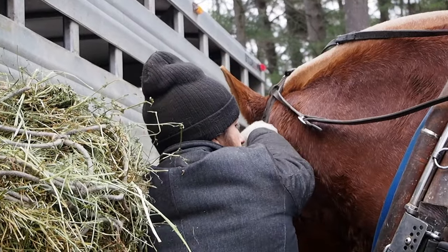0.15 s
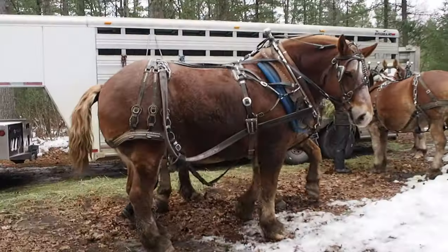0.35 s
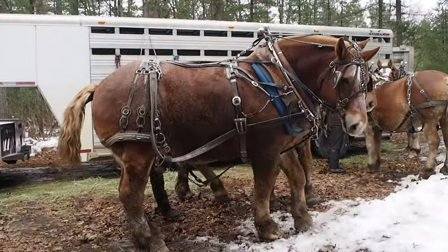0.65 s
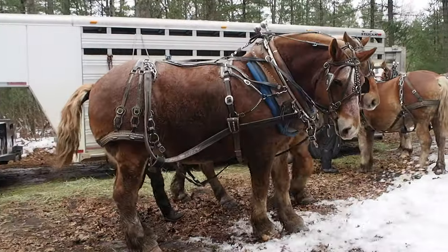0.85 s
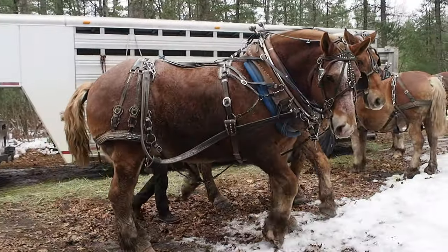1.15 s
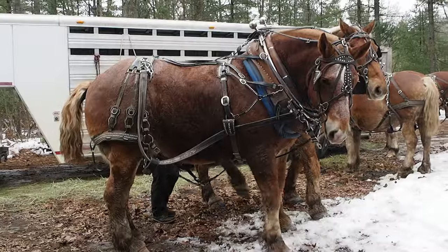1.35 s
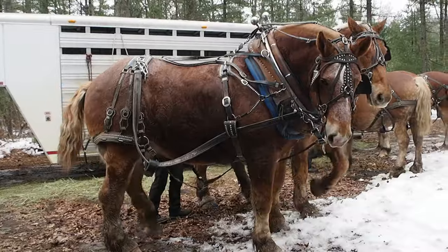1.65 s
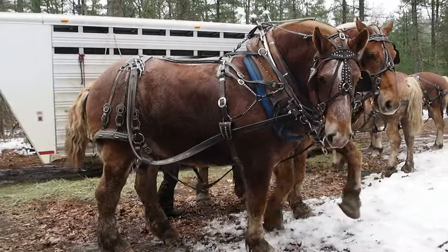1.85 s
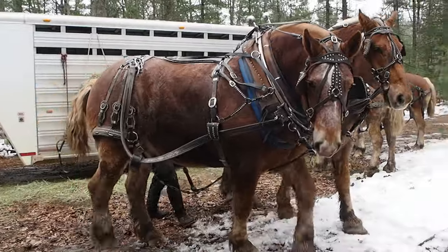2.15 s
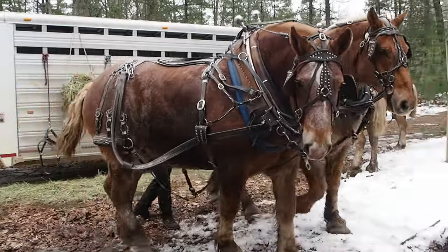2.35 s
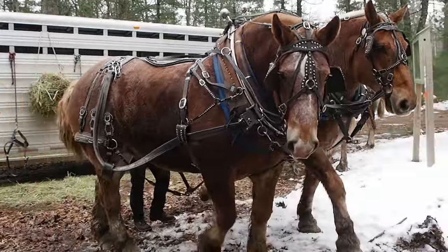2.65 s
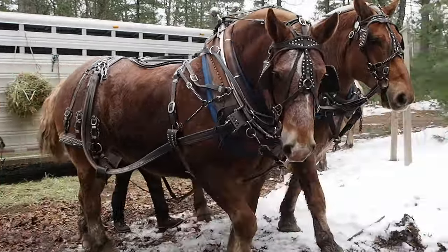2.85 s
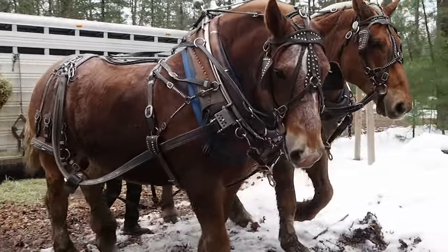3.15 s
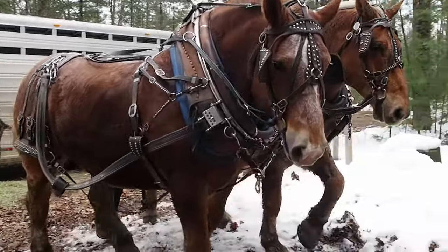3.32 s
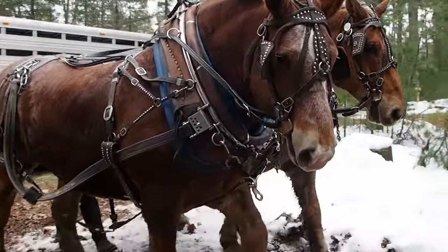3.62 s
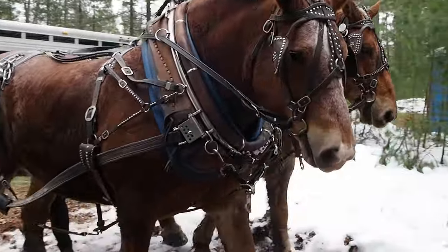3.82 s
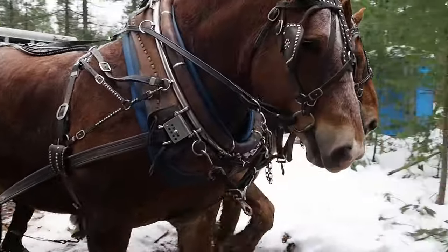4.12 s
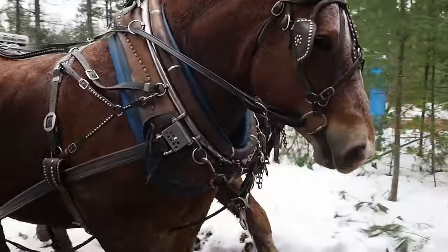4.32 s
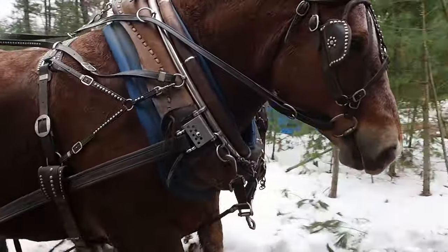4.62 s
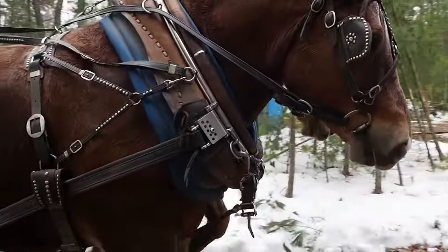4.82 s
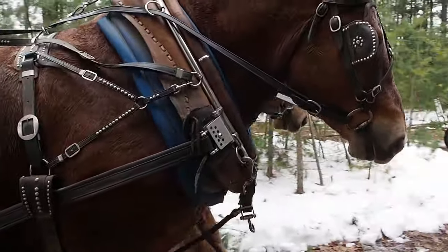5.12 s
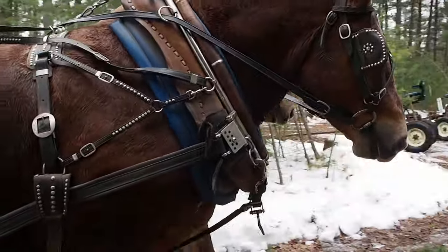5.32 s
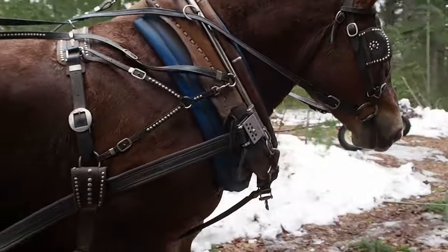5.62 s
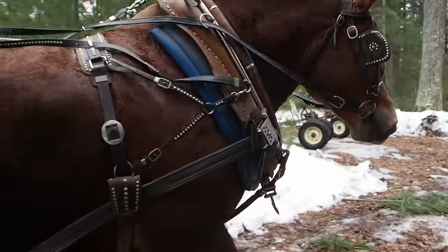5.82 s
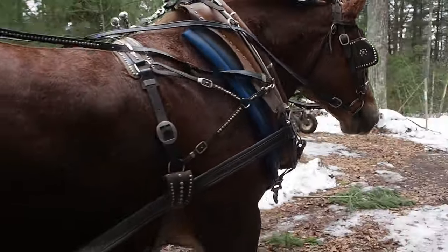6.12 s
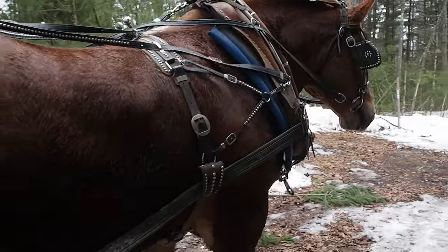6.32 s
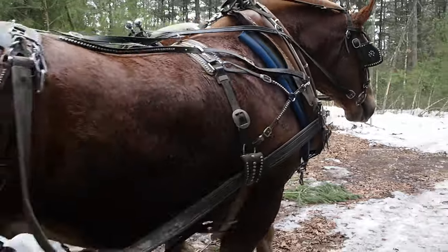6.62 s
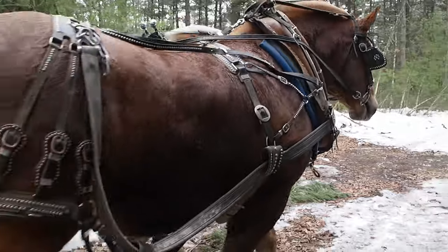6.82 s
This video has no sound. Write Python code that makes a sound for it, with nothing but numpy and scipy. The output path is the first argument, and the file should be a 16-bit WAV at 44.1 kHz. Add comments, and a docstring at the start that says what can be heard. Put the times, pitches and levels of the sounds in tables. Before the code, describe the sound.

Two harnessed draft horses walk past close to a stereo microphone in a quiet wood. Their hooves thud and scuff unevenly, crackling through wood chips and squashing old snow, with an occasional twig snap. As the team comes nearer, the steps grow a little louder and the steel rings and snaps of the harness knock together in short, damped clinks, with a few light chain tinkles.

```python
"""Hooves thud and scuff over wood chips and old snow: two harnessed draft horses walk past, close
to a stereo microphone in a quiet wood. Under their weight the chips crackle, the snow packs with a
low squash and ice crystals fizz, all in swarms of tiny fractures. As the team comes near, the steel
rings and snaps of the harness knock together in short, leather-damped clinks."""
import sys
import numpy as np
from scipy import signal
from scipy.io import wavfile
from scipy.ndimage import uniform_filter1d

SR = 44100
rng = np.random.default_rng(int(sys.argv[2]) if len(sys.argv) > 2 else 0)


def output_pcm(signal):
    """Save a mono or channel-first signal as 16-bit PCM at the path in sys.argv[1].

    Samples are clipped to [-1, 1] before scaling.
    """
    pcm = np.clip(np.atleast_2d(signal).T, -1, 1) * 32767
    wavfile.write(sys.argv[1], SR, np.round(pcm).astype(np.int16))


N = 307509

# Spectra. Each row: frequency in Hz, level in dB per Hz.
AIR_SPECTRUM = [(18, -40), (30, 7), (48, 7.5), (153, 12), (189, -1), (449, 8), (1430, -15), (3980, 1),
                (11700, -5), (16000, -5.5)]  # quiet woodland
CRACKLE_SPECTRUM = [(47, -47), (80, -15), (289, 0), (353, -16), (629, -6.5), (1120, -12), (1340, -2),
                    (2600, -1), (3240, 2), (4140, 2.5), (5770, -4), (12300, -10), (14600, -18.5),
                    (16000, -38)]  # chips and ice breaking
SQUASH_SPECTRUM = [(70, -15), (150, -8), (300, -2.5), (550, 0.5), (900, -1), (1300, -1), (1650, -4.5),
                   (2300, -10), (5000, -54)]  # snow packing
RUMBLE_SPECTRUM = [(25, -13), (45, -3), (58, -6), (75, 12), (130, 12.5), (200, 5), (400, -19)]  # low, wide rumble at the microphone
# Width of the stereo microphone. Each row: frequency in Hz, gain of the side signal in dB.
MIC_WIDTH = [(60, 10.5), (120, 0.5), (220, -2), (400, -3.5), (700, -4.5), (1300, -7), (2400, -12),
             (4400, -23), (6000, -4), (8200, 1), (15000, 1.5)]

# The team shuffles in the litter, louder as it nears. Each row: time in seconds, level in dB.
SHUFFLE_LEVELS = [(0, -48.5), (.2, -55.5), (.29, -58), (.33, -44), (1.2, -44), (1.68, -43.5), (2.3, -39),
                  (4.05, -41), (4.95, -40), (6.97, -38.5)]
# Offsets on that level in dB, for crackle, squash and fizz.
SHUFFLE_SHARE_DB = [0, -8, -10.5]
# The ground gives under a hoof. Each row: time of full load and hold in seconds, then crackle,
# squash and fizz in dB.
HOOF_LOADS = [(0.613, 0.12, -41, -41.5, -48.5), (0.862, 0.037, -38, -47.5, -49.5),
              (0.946, 0.13, -41, -72, -46.5), (1.136, 0.16, -38.5, -46, -45.5),
              (1.41, 0.085, -39.5, -44, -49), (1.784, 0.074, -38.5, -48.5, -47),
              (2.081, 0.19, -34, -42.5, -45), (2.378, 0.063, -37, -43.5, -42),
              (2.612, 0.079, -37, -59, -38.5), (2.75, 0.046, -30.5, -34.5, -38.5),
              (2.828, 0.31, -31.5, -41.5, -39), (3.343, 0.21, -37.5, -51, -39.5),
              (3.585, 0.058, -37, -36, -43.5), (3.707, 0.11, -38, -48, -42), (3.862, 0.1, -35, -40, -40.5),
              (4.215, 0.15, -37.5, -46.5, -48.5), (4.462, 0.042, -35.5, -42, -47),
              (4.62, .11, -34, -35, -46), (4.77, 0.087, -48, -47.5, -55), (5.033, 0.044, -37.5, -48, -62),
              (5.13, 0.17, -28.5, -43, -35.5), (5.35, 0.21, -38.5, -59, -43.5),
              (5.666, 0.04, -38, -50, -52), (5.952, 0.072, -32, -43, -39), (6.058, 0.095, -35, -43, -44.5),
              (6.512, 0.094, -41, -45, -47.5), (6.7, 0.17, -36, -41, -44)]
# A hoof breaks the crust. Each row: start and length in seconds, then crackle, squash and fizz in dB.
HOOF_SCUFFS = [(0.254, 0.016, -45.5, -45.5, -50), (0.36, 0.02, -32.5, -43, -44),
               (0.541, 0.059, -26, -33.5, -36), (0.59, 0.029, -40, -30, -55),
               (1.105, 0.044, -31.5, -39, -39.5), (1.214, 0.052, -33, -37.5, -52),
               (1.47, 0.027, -34.5, -39.5, -53), (1.724, 0.049, -23, -36, -33),
               (1.965, 0.057, -27.5, -38, -42), (2.103, 0.015, -34, -38, -32.5),
               (2.242, 0.031, -29.5, -39.5, -41.5), (2.39, 0.03, -30, -39, -39.5),
               (2.649, 0.054, -30.5, -33.5, -43), (3.858, 0.055, -33, -38.5, -36),
               (4.07, 0.052, -29.5, -38.5, -40.5), (4.199, 0.061, -34, -37.5, -45),
               (4.376, 0.019, -28, -34.5, -40), (5.115, 0.032, -22, -35.5, -31.5),
               (5.974, 0.028, -29.5, -35, -33.5), (6.674, 0.018, -25.5, -37, -35),
               (6.746, 0.067, -27, -43, -33)]
# Chips and twigs snap. Each row: start in seconds, level in dB, treble in dB.
TWIG_SNAPS = [(.365, -31, -3), (1.7708, -31, 11), (3.067, -29, 4), (3.113, -30, 12), (3.2964, -32, 2),
              (4.358, -30.5, 5), (4.3644, -38, 11), (4.7541, -28, -6), (5.0564, -30, -8),
              (6.0513, -25.5, -2), (6.1968, -26.5, -20), (6.731, -29, -2), (6.907, -33, 2)]
# Hooves land. Each row: start in seconds, level in dB, pitch in Hz, rumble and crack offsets in dB.
FOOTFALLS = [(0.107, -33.5, 136, -34, -22), (0.503, -21, 458, -29.5, -9.5), (0.602, -21.5, 485, -34, -14),
             (1.22, -31, 509, -29, -12), (1.473, -26.5, 409, -22, -18), (2.058, -26, 524, -32, -13),
             (2.101, -32, 207, -21, -2), (2.173, -26, 535, -23, -15), (2.362, -25, 505, -26, -16),
             (3.396, -27.5, 695, -26, -16), (3.874, -30, 614, -42, -18), (4.384, -23.5, 625, -24, -21),
             (4.837, -32.5, 248, -13.5, -3), (5.147, -25, 291, -15.5, -10), (5.244, -31, 269, -18, 7),
             (5.454, -29, 293, -18, -5), (5.569, -37.5, 234, -13, -2), (5.857, -21, 312, -21.5, -21),
             (6.026, -27.5, 306, -17.5, 4), (6.133, -26, 570, -23, -10), (6.197, -22.5, 740, -40, -16),
             (6.317, -22, 265, -22.5, -13), (6.538, -28, 620, -19, 3.5)]

# Modes of the steel. Each row: frequency in Hz, level in dB, seconds to fall by 60 dB.
FITTING_MODES = [(1200, -19, 0.068), (1842, -7.5, 0.032), (2204, -12, 0.056), (2904, -2, 0.024),
                 (3018, -0.5, 0.046), (3060, -15, 0.24), (3110, -4.5, 0.045), (3672, -1, 0.021),
                 (3934, 3, 0.03), (4106, -1, 0.016), (4520, -8, 0.049), (5140, -8, 0.052),
                 (6200, -6.5, .018), (7100, -15, 0.06), (7660, -15, 0.065), (8590, -11, 0.063),
                 (10320, -13, 0.055), (11530, -15, 0.037), (12900, -16.5, 0.064), (15150, -30, 0.044)]  # rings and snaps, before each clink scales them
CHAIN_MODES = [(5100, -5, 0.039), (9960, -4.5, 0.064), (10770, -14, .06), (13520, -16, .06)]  # a small chain link
# Fittings knock. Each row: start in seconds, level in dB, rough pitch in Hz, treble in dB,
# factor on the ring time.
HARNESS_CLINKS = [(2.176, -29.5, 3120, -9, 1.2), (2.4166, -27.5, 3390, -5, 1), (3.7256, -25, 4190, -1, 1),
                  (3.7294, -22.5, 3110, -3, 1.1), (3.846, -16, 2915, 1.5, 0.92),
                  (3.8995, -25.5, 4000, -3, .9), (4.1557, -15.5, 2986, 1.5, 0.95),
                  (4.1676, -18, 2976, 1.5, 1), (4.235, -22, 4050, -20, 0.97), (4.3086, -25, 2800, -9, .32),
                  (4.419, -27.5, 3380, -5, .76), (4.466, -32, 2910, 13, 1.1),
                  (4.5223, -16.5, 2974, -5, 0.74), (4.5265, -26, 3040, -1, 0.63),
                  (5.024, -23, 3880, -2.5, 0.54), (5.1083, -26, 3300, 0, .75), (5.1974, -25, 3710, -2, .76),
                  (5.3192, -17, 3990, 2, .34), (5.3254, -17.5, 4020, 2.5, 0.7),
                  (5.6047, -30, 3800, -10, .67), (5.679, -16, 3860, -0.5, 1.5),
                  (5.6978, -21, 3790, -10, 1.6), (5.7106, -25, 3970, -15, 1),
                  (5.717, -21.5, 4130, -20, 0.76), (5.7264, -29, 2980, -7, 1.3),
                  (5.816, -30, 3980, -8, 0.8), (5.9183, -29, 3950, -10, .54), (6.0506, -30, 3290, -3, .56),
                  (6.061, -34, 4500, 7, .5), (6.125, -25.5, 3080, -3, .77), (6.1456, -32, 3000, 1, .9),
                  (6.2926, -29.5, 2780, -9, .6), (6.5007, -28.5, 3730, -3, 0.74)]
# The chain link tinkles. Each row: start in seconds, level in dB.
CHAIN_TINKLES = [(4.44, -28), (5.732, -28.5), (6.051, -17), (6.503, -31)]


def gain_of(db):
    """Decibels to amplitude."""
    return 10 ** (np.asarray(db) / 20)


def rms(x):
    """Root mean square."""
    return np.sqrt(np.mean(x ** 2) + 1e-20)


def colour(x, spectrum, size=4096):
    """Causal filter from rows of Hz and dB, so that clicks keep their sharp front."""
    hz, db = np.transpose(spectrum)
    bin_hz = abs(np.fft.fftfreq(size, 1 / SR))
    bin_db = np.interp(np.log(bin_hz + 1), np.log(hz + 1), db)
    log_gain = np.log(gain_of(np.maximum(bin_db, -100)))
    taps = np.fft.ifft(np.exp(np.conj(signal.hilbert(log_gain)))).real  # minimum phase
    return signal.oaconvolve(x, taps[None, :size // 2], axes=1)[:, :x.shape[1]]


def band(x, low_hz, high_hz, order=2):
    """Band-pass filter."""
    return signal.sosfilt(signal.butter(order, [low_hz, high_hz], "band", fs=SR, output="sos"), x)


def add(mix, start, sound):
    """Lays a mid-side sound into the mix at a start in seconds."""
    part = mix[:, round(start * SR):][:, :sound.shape[1]]
    part += sound[:, :part.shape[1]]


def wander(per_s):
    """Smooth random motion of about unit size."""
    knots = rng.standard_normal(N // 16)
    return np.interp(np.arange(N) * per_s / SR, np.arange(len(knots)), knots)


def woodland():
    """Faint, even hush of air among the trees, all around the microphone."""
    hush = colour(rng.standard_normal((2, N)), AIR_SPECTRUM)
    return gain_of(-59.5) * hush / rms(hush[0])


def reflections(x, echoes_per_s=2500, early_t60_s=0.097, late_t60_s=0.5):
    """Ground, bodies and trunks send a thin, short tail back to the microphone."""
    t = np.arange(SR // 2) / SR
    taps = rng.standard_normal((2, len(t))) * (rng.random((2, len(t))) < echoes_per_s / SR) * (t > .003)
    taps *= gain_of(-60 * t / early_t60_s) + gain_of(-11) * gain_of(-60 * t / late_t60_s)
    return signal.fftconvolve(x[:1], taps / np.linalg.norm(taps[0]), axes=1)[:, :N]


def tick(t, treble_db, chatter):
    """One hard contact and a brief chatter of smaller ones after it."""
    contact = chatter * rng.standard_normal((2, len(t))) * np.exp(-t / 0.0054)
    contact[:, 0] += [1, .6]
    body = [(200, -25), (1100, -8), (2200, -3), (3500, 3), (5200, -8)]
    treble = [(6800, treble_db - 6.5), (10000, treble_db - 16), (16000, treble_db - 35)]
    sound = colour(contact, body + treble)
    return sound / rms(sound[0, :SR // 300])


def twigs():
    """Twigs and larger chips break one at a time, without ringing."""
    out, t = np.zeros((2, N)), np.arange(SR // 20) / SR
    for start, db, treble_db in TWIG_SNAPS:
        add(out, start, gain_of(db) * tick(t, treble_db, chatter=0.072))
    return out


def pressure(layer, load_s=0.039, ease_s=0.044):
    """Envelope of crackle (0), squash (1) or fizz (2): shuffling, steps bearing down, quick scuffs."""
    t = np.arange(N) / SR
    power = gain_of(np.interp(t, *np.transpose(SHUFFLE_LEVELS)) + SHUFFLE_SHARE_DB[layer]) ** 2
    for loaded_at, hold, *levels in HOOF_LOADS:
        load = np.clip(1 + (t - loaded_at) / load_s, 0, 1)
        ease = np.exp(-np.maximum(t - loaded_at - hold, 0) / ease_s)
        power += (gain_of(levels[layer]) * load * ease) ** 2
    for start, length, *levels in HOOF_SCUFFS:
        swell = np.interp((t - start) / length, [0, .24, .55, 1, 1.6], [0.0073, 0.87, 1, 0.45, 0.0008])
        power += (gain_of(levels[layer]) * swell) ** 2
    return np.sqrt(power)


def fractures(spectrum, band_hz, per_s, spread_db, clump_db):
    """Tiny breaks of uneven size, in clumps, each reaching the microphone from its own direction."""
    size = gain_of(spread_db * np.minimum(rng.exponential(1, N), 5) + clump_db * wander(per_s=170))
    mid = size * rng.choice([-1, 1], N) * (rng.random(N) < per_s / SR)
    side = mid * rng.standard_normal(N)
    sound = band(colour(np.array([mid, side]), spectrum), *band_hz)
    return sound / rms(sound[0])


def flickering_colour(x, depth_db):
    """Brief random peaks and dips, a few hundred Hz wide, colour the crunch."""
    frames = signal.stft(x, nperseg=1024, noverlap=768)[2]
    patches = uniform_filter1d(rng.standard_normal(frames.shape[1:]), size=5, axis=0)  # over frequency
    patches = uniform_filter1d(patches, size=4, axis=1)  # over time
    frames *= gain_of(depth_db * patches / rms(patches))
    sound = signal.istft(frames, nperseg=1024, noverlap=768)[1][:, :N]
    return sound * rms(x) / rms(sound)


def ground_crunch(tilt_per_db=0.5, neutral_ice_db=-7.5, split_hz=3000):
    """Underfoot, chips crackle, snow packs with a low squash and ice crystals fizz."""
    chips, snow, ice = map(pressure, range(3))
    crackle = chips * fractures(CRACKLE_SPECTRUM, (1580, 6170), per_s=8000, spread_db=2.5, clump_db=2)
    squash = snow * fractures(SQUASH_SPECTRUM, (98, 2600), per_s=3500, spread_db=2, clump_db=0.5)
    fizz = ice * fractures(CRACKLE_SPECTRUM, (6040, 16900), per_s=12000, spread_db=3, clump_db=1.5)
    # icy ground crackles brighter
    crisp_db = tilt_per_db * (20 * np.log10(ice / chips) - neutral_ice_db)
    coarse = signal.filtfilt(*signal.butter(3, split_hz, fs=SR), crackle)
    crackle = coarse * gain_of(-crisp_db) + (crackle - coarse) * gain_of(crisp_db)
    return flickering_colour(crackle + squash + fizz, depth_db=2.5)


def ringing(modes, boost_db, t):
    """Dying modes; every blow lands elsewhere, so it stirs and radiates them a little differently."""
    hz, db, t60 = np.transpose(modes)
    detune, uneven, side, phase = rng.standard_normal((4, len(hz)))
    waves = np.sin(2 * np.pi * (np.outer(hz * (1 + 0.0016 * detune), t) + phase[:, None]))
    waves *= gain_of((db + boost_db + 0.5 * uneven)[:, None] - 60 * t / t60[:, None])
    return np.array([waves.sum(0), 0.65 * side @ waves])


def clink(db, ring_hz, treble_db, length):
    """Steel strikes steel: a hard tick, then a ring that leather soon damps."""
    t, hz = np.arange(SR // 6) / SR, np.transpose(FITTING_MODES)[0]
    # the struck ring favours its first bending mode, and its second at 2.83 times that
    first, second = np.exp(-(np.log(hz / [[ring_hz], [np.sqrt(8) * ring_hz]]) / 0.075) ** 2)
    boost_db = 10 * first + 5 * second + treble_db * (hz > 4800)
    tuning = (ring_hz / hz[np.argmax(first)]) ** 0.71  # the fittings differ a little in size
    modes = np.array(FITTING_MODES) * [tuning, 1, length]
    ring = ringing(modes, boost_db, t) * (1 - np.exp(-t / 0.00013))
    ring /= rms(ring[0, :SR // 150])
    return gain_of(db) * (ring + gain_of(-4) * tick(t, treble_db + 3, chatter=0.17))


def harness(rebound_s=0.008, rebound_db=-18.5, close_from_s=2.8, jiggles_per_s=3):
    """Rings and snaps knock and fall back once, a chain tinkles, and close up faint jiggles carry."""
    out, t = np.zeros((2, N)), np.arange(SR // 6) / SR
    for start, db, *fitting in HARNESS_CLINKS:
        add(out, start, clink(db, *fitting))
        add(out, start + rebound_s * rng.uniform(.5, 1.5), clink(db + rebound_db, *fitting))
    for start, db in CHAIN_TINKLES:
        mid, side = gain_of(db) * ringing(CHAIN_MODES, 0, t)
        add(out, start, np.array([mid, side - 0.78 * mid]))  # the chain hangs to the right
    for slot in np.arange(close_from_s, N / SR, 1 / jiggles_per_s):
        start = slot + rng.random() / jiggles_per_s
        add(out, start, clink(db=-38.5, ring_hz=rng.uniform(2900, 4000), treble_db=3, length=0.87))
    return out


def hooves(decay_cycles=4.3):
    """A heavy foot cracks the surface and thuds; a low, wide rumble at the microphone swells after."""
    out, t = np.zeros((2, N)), np.arange(SR // 4) / SR
    sag_s = 0.14 * (t - 0.019 * (1 - np.exp(-t / 0.0095)))  # the pitch sags as the foot sinks in
    for start, db, hz, rumble_db, crack_db in FOOTFALLS:
        puff, rumble, crack = rng.standard_normal((3, 2, len(t)))
        fade = np.exp(-t * hz / decay_cycles)
        knock = np.sin(2 * np.pi * hz * (t - sag_s)) * fade * (1 - np.exp(-t / 0.00083))
        puff = band(puff, 0.42 * hz, 1.34 * hz)
        puff *= fade * (1 - np.exp(-t / .001)) / rms(puff)
        crack = band(crack, 500, 3300, order=1)
        crack *= np.exp(-t / 0.0034) / rms(crack)
        rumble = colour(rumble, RUMBLE_SPECTRUM)
        rumble *= (t / 0.056 * np.exp(1 - t / 0.047)) ** 2 / rms(rumble)
        thud = gain_of(-5.5) * np.outer([1, -.7], knock) + gain_of(-8.5) * puff
        add(out, start, gain_of(db) * (thud + gain_of(crack_db) * crack + gain_of(rumble_db) * rumble))
    return out


def scene():
    """All sources meet at the microphone as mid and side, and leave it as left and right."""
    sharp = harness() + twigs()
    mix = ground_crunch() + sharp + gain_of(-11) * reflections(sharp) + hooves() + woodland()
    mid, side = mix[0], colour(mix[1:], MIC_WIDTH)[0]
    side = side - 0.21 * band(mid, 70, 1300, order=1)  # the low sounds lean to the right
    return np.array([mid + side, mid - side])


def record(dry):
    """The sound drops out for an instant early on, and the highest treble is cut."""
    gap_centre_s, gap_s, cutoff_hz = 0.2975, 0.021, 16100
    live = abs(np.arange(N) / SR - gap_centre_s) > gap_s / 2
    lowpass = signal.firwin(255, cutoff_hz, window=("kaiser", 9), fs=SR)
    return signal.oaconvolve(dry * live, lowpass[None], "same")


dry = scene()
out = record(dry)
output_pcm(out)
```